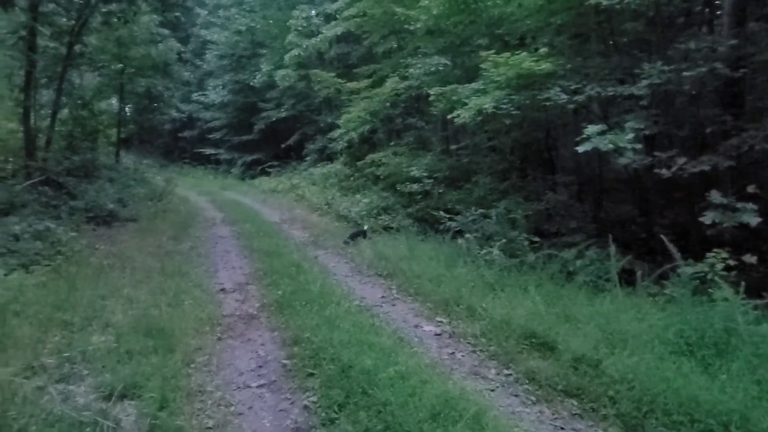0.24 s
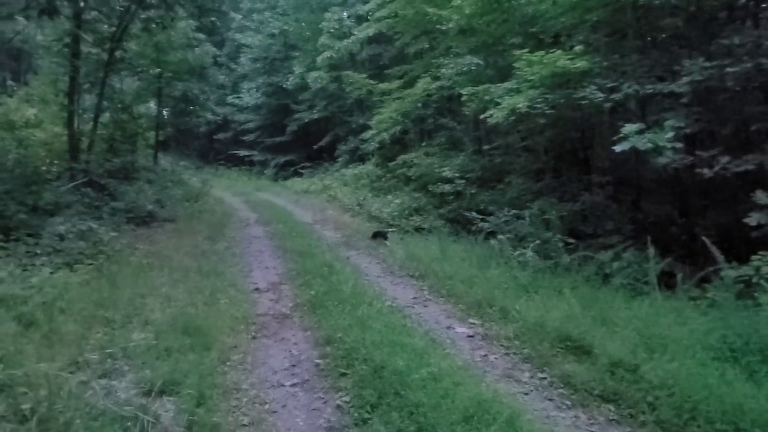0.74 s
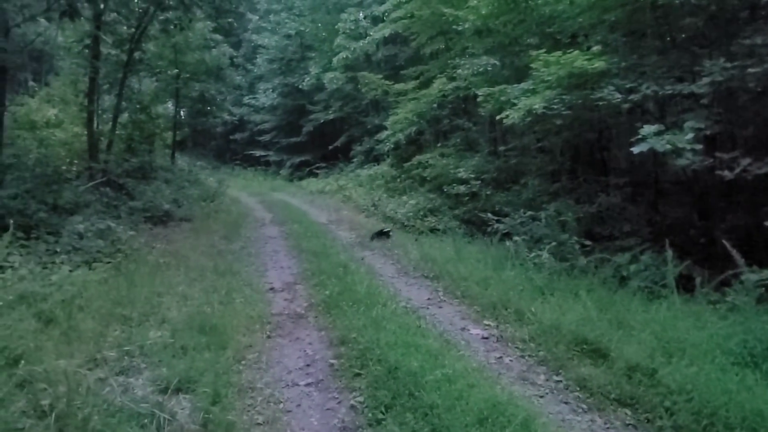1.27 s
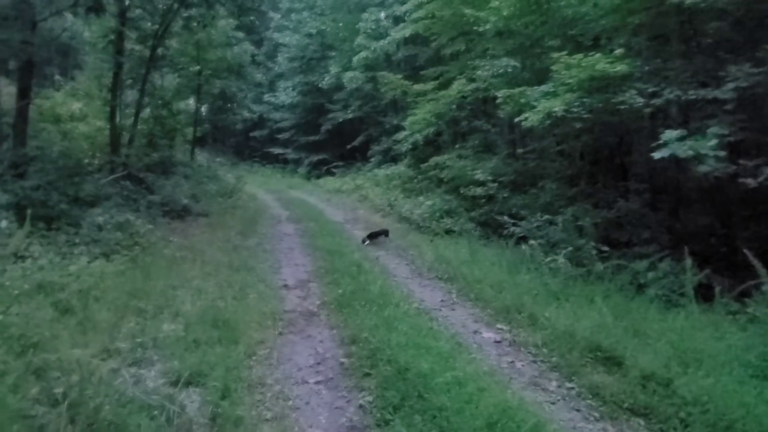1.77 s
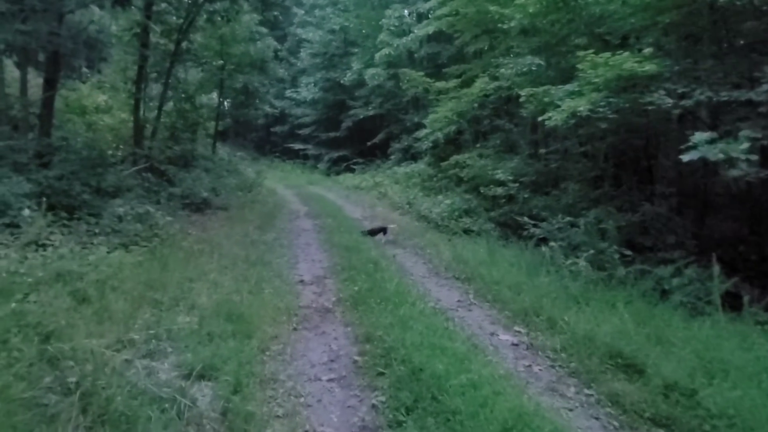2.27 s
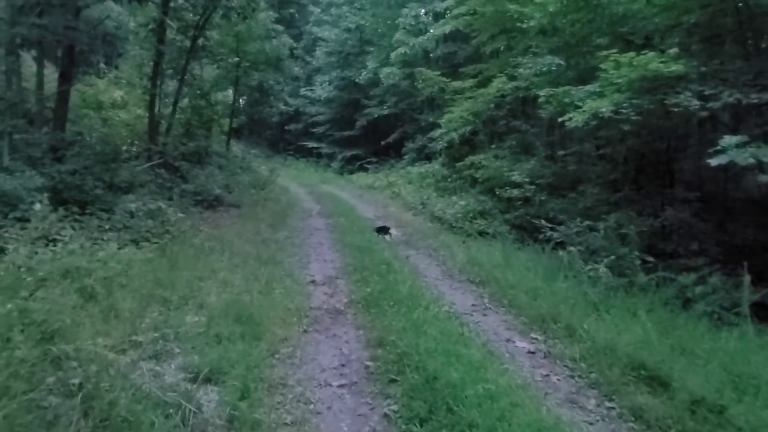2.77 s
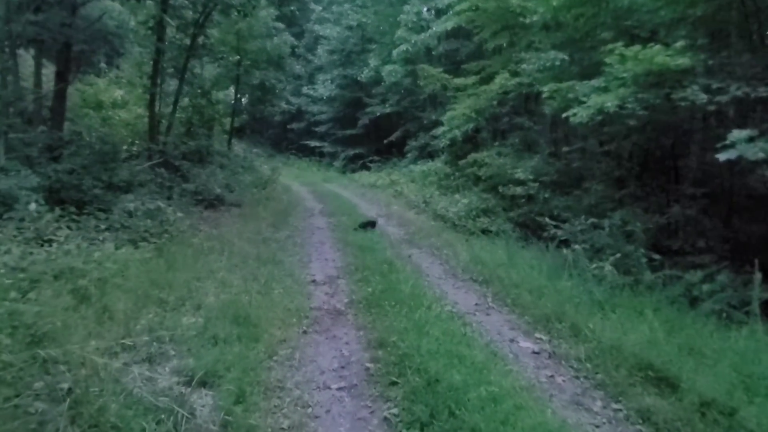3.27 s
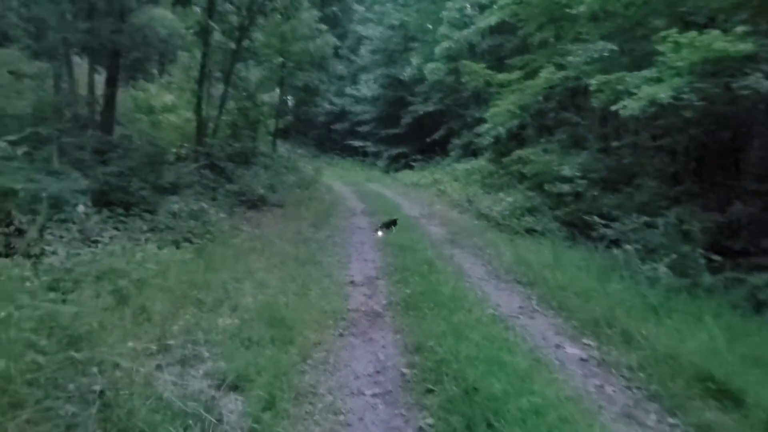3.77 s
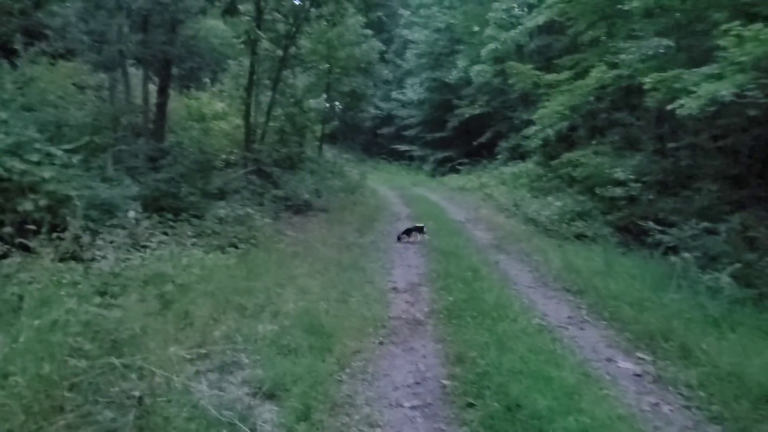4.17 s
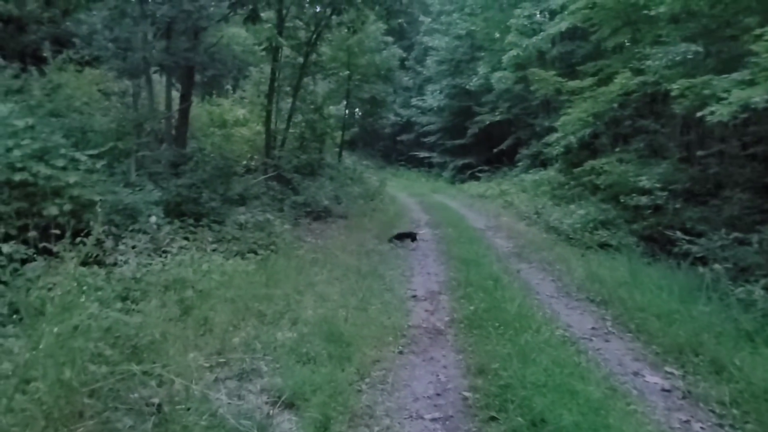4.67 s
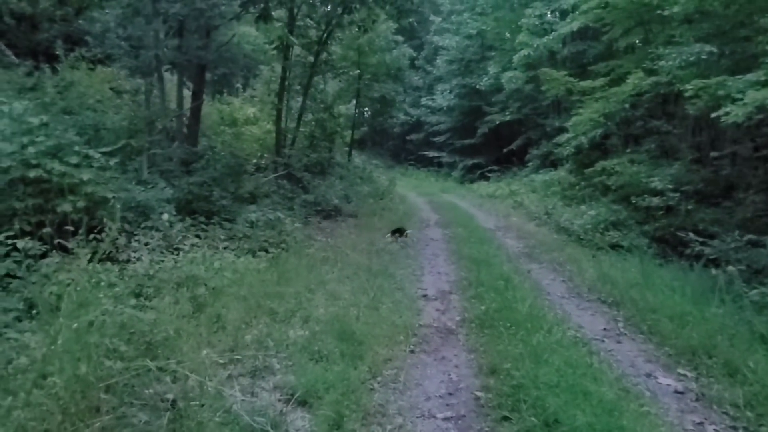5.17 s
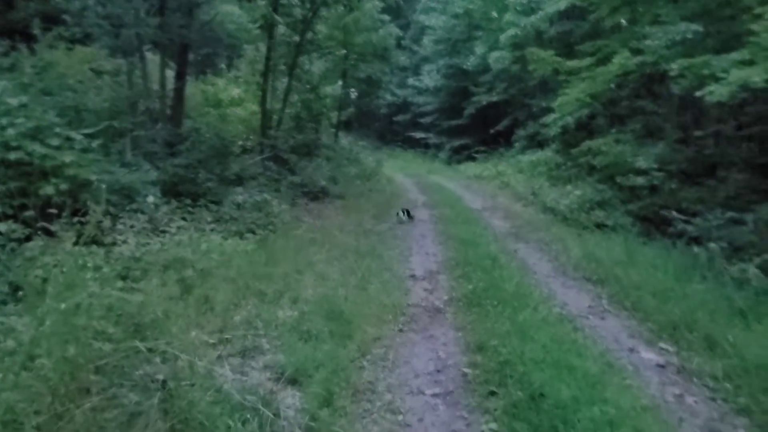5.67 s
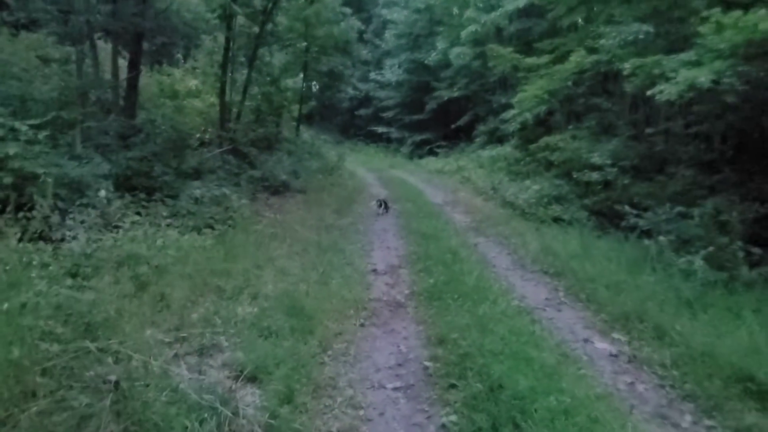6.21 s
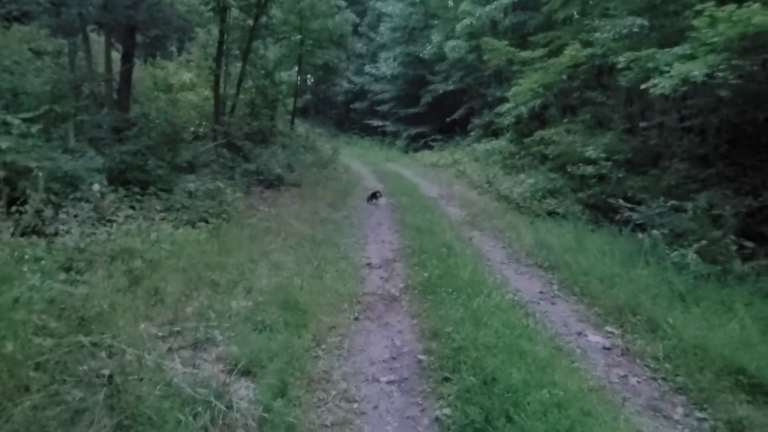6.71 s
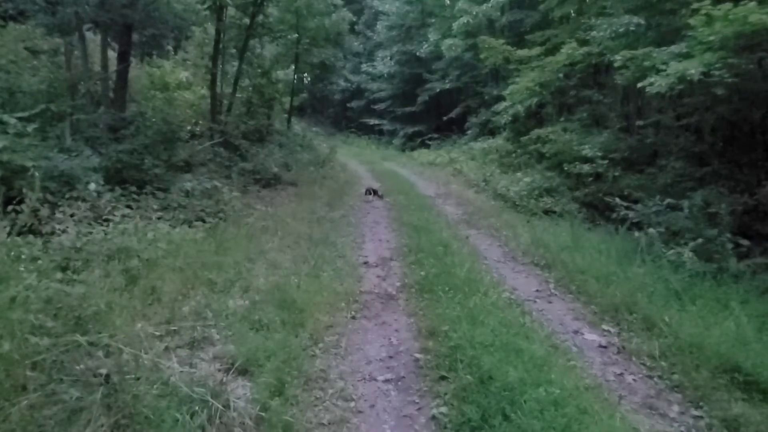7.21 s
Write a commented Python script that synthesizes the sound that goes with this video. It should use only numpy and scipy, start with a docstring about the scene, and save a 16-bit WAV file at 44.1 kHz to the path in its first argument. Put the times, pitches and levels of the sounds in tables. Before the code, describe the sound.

On a forest track, a hound at some distance bawls three times, a couple of seconds apart, each cry short, hoarse and ringing, with echoes lingering in the trees. Close to the microphone a small metal clasp jingles lightly throughout. Insects trill high and steady, crickets chirp faintly, and a distant engine hums very low. Dry handling knocks become strongest just after the last bawl.

```python
"""Forest track: a hound some way off bays three times, and the trees ring on after each hoarse bawl.
The voice is clear harmonics plus a fluttering rasp, throat resonances and hiss, convolved with scattered echoes.
Close by, a metal clasp of six decaying modes jingles, with noise-burst knocks and scuffs of handling.
Band-shaped noise makes the insect trill, falling sine strokes the crickets, a wavering sine the far engine's hum;
filtered noise is the still air."""
import sys
import numpy as np
from scipy import signal
from scipy.fft import rfft, irfft, next_fast_len
from scipy.io import wavfile
from scipy.ndimage import uniform_filter1d, minimum_filter1d

SR = 44100
rng = np.random.default_rng(int(sys.argv[2]) if len(sys.argv) > 2 else 0)


def dump(signal):
    """Clip the signal to [-1, 1] and save it as 16-bit WAV at the path in sys.argv[1]."""
    limited = np.clip(np.atleast_2d(signal).T, -1, 1)
    pcm = np.round(limited * 32767).astype(np.int16)
    wavfile.write(sys.argv[1], SR, pcm)


N = 328545
TIME, FREQS = np.arange(N) / SR, np.fft.rfftfreq(N, 1 / SR)


def amp(db):
    """Decibels to gain."""
    return 10 ** (np.asarray(db) / 20)


def evened(x):
    """Scales to rms 1."""
    return x / np.sqrt(np.mean(abs(x) ** 2) + 1e-20)


def shares(ratio_db):
    """Two gains, ratio_db apart, whose powers sum to 1."""
    ratio = amp(ratio_db)
    return np.array([ratio, np.ones_like(ratio)]) / np.sqrt(1 + ratio ** 2)


def read(points, hz):
    """Reads a spectrum table on a log-frequency axis."""
    f, value = np.transpose(points)
    return np.interp(np.log(hz + 1), np.log(f + 1), value)


def curves(rows, t):
    """Every column of a time table at the times t."""
    s, *columns = np.transpose(rows)
    return [np.interp(t, s, c) for c in columns]


def add(mix, start_s, sound):
    """Mixes a sound into a stereo mix at start_s."""
    part = mix[:, max(round(start_s * SR), 0):][:, :sound.shape[-1]]
    part += sound[..., :part.shape[-1]]


def panned(side_db):
    """Left and right gains, side_db apart, with rms 1."""
    return evened(amp([[side_db / 2], [-side_db / 2]]))


def coloured(x, points):
    """Filters by a spectrum table."""
    n = x.shape[-1]
    return irfft(rfft(x) * amp(read(points, np.fft.rfftfreq(n, 1 / SR))), n)


def noise(points, n):
    """Unrelated noise in both channels with the given spectrum, scaled to rms 1."""
    return evened(coloured(rng.standard_normal((2, next_fast_len(n))), points))[:, :n]


def wander(n, rate_hz):
    """Smooth random curve of rms 1 with a Gaussian roll-off at rate_hz."""
    m = next_fast_len(n)
    rolloff = np.exp(-(np.fft.rfftfreq(m, 1 / SR) / rate_hz) ** 2)
    return evened(irfft(rfft(rng.standard_normal(m)) * rolloff, m))[:n]


def angle(hz):
    """Running phase of a frequency curve."""
    return 2 * np.pi * np.cumsum(hz) / SR


def resonate(x, hz, width_hz, order=2):
    """A resonance that follows the curve hz, applied order times for steep flanks."""
    turn = np.exp(1j * angle(hz * np.ones(len(x))))
    r = np.exp(-np.pi * width_hz / SR)
    z = x / turn
    for _ in range(order):
        z = signal.lfilter([1 - r], [1, -r], z + 1e-18)
    return (turn * z).real


def steadied(x, size=1300):
    """Holds the loudness at 1 and keeps the fast grain."""
    return x / np.sqrt(abs(uniform_filter1d(x ** 2, size)) + 1e-12)


# low and middle throat resonances: settled_hz, gape_rise_hz, end_fall_hz
THROAT_HZ = [(809.8, 200, 70), (1507, 25, 13)]
# low, middle and high throat resonance: width_hz of one filter pass
THROAT_WIDTH_HZ = [390, 620, 640]
# turbulence in the throat: freq_hz, density_db
HOARSE = [(700, -25), (1100, -7.5), (1500, -7.5), (2100, 3), (3200, 0), (3800, -8), (4500, -24),
          (6000, -44.5)]
# how the rasp radiates: freq_hz, gain_db
MUZZLE = [(250, -29), (500, -20.5), (640, -5.5), (760, -2), (1050, -1.5), (1180, 1.5), (1330, -5),
          (2050, 2), (3500, -1.5), (4300, -8.5)]
# hiss on top of the bawl: freq_hz, density_db
VOICE_AIR = [(2500, -23), (3500, -4), (4400, 4), (5700, -2.5), (7000, 3), (8200, -9.5), (11500, -5),
             (12800, -7.5), (15500, -14)]
SCOOP_SHARE, SCOOP_S, DROOP_S = .26, .032, .05  # pitch starts low, scoops up, droops at the end
WAVER_SHARE, WAVER_HZ, THROAT_DRIFT_SHARE = .014, 14.75, .028
RELEASE_S, GAPE_S = .035, .08  # the mouth starts wide and settles with GAPE_S
# clear fundamental over the rasp: grows as the voice tires and as pitch climbs into the low resonance
CLEAR_TIRED_DB, CLEAR_GAPE_DB, CLEAR_DB_PER_HZ, CLEAR_FROM_HZ = 6, -14.5, 0.06, 665
OCTAVE_TIRED_DB = -13.5  # the octave fades toward the end
HISS_ENDS_DB = -43  # drop one bawl's length from the hiss peak
HISS_BURST_DB, HISS_BURST_HZ = 4.5, 6  # the hiss comes unevenly
PUSH_HZ_PER_DB = 1.5  # pushing harder sharpens the note
BRIGHT_HZ_PER_DB = 8  # a brighter voice lifts the middle resonance
OPEN_HZ, OPEN_WIDTH_HZ = 1980, 900


def bawl(row, effort, jitter=.01, second_side=0.94, lower_side=.15, clear_top=0.95, third_db=-17,
         chest_db=-34, low_db=1.0, middle_db=1.0, high_db=-3, open_db=-2, settled_gape=0.16, hoarse_db=-7):
    """The folds sing a high clear note while looser tissue flutters unevenly and rasps above each harmonic."""
    (start_s, end_s, attack_s, held_hz, yelp_hz, yelp_at_s, yelp_s, droop_hz,
     clear_db, octave_db, hiss_db, hiss_peak) = row
    t = np.arange(0, end_s - start_s, 1 / SR)
    n, spent = len(t), t / t[-1]
    gape = np.exp(-t / GAPE_S)
    yelp = np.exp(-((t - yelp_at_s) / yelp_s) ** 2)
    level_db, bright_db, treble_db, high_hz = curves(effort, start_s + t)

    hz = held_hz * (1 - SCOOP_SHARE * np.exp(-t / SCOOP_S) + WAVER_SHARE * wander(N, WAVER_HZ)[:n])
    hz = hz + yelp_hz * yelp - droop_hz * np.exp((t - t[-1]) / DROOP_S)
    throat_hz = [(f + rise * gape - fall * spent) * (1 + THROAT_DRIFT_SHARE * wander(N, WAVER_HZ)[:n])
                 for f, rise, fall in THROAT_HZ]
    hz = hz + PUSH_HZ_PER_DB * (level_db - level_db.mean())
    throat_hz[1] = throat_hz[1] + BRIGHT_HZ_PER_DB * bright_db

    # low and middle registers share their power between a clear line and the rasp
    clear_ratio_db = clear_db + CLEAR_TIRED_DB * spent + CLEAR_GAPE_DB * gape
    clear_ratio_db = clear_ratio_db + CLEAR_DB_PER_HZ * np.maximum(hz - CLEAR_FROM_HZ, 0)
    first, low = shares(clear_ratio_db) * amp(level_db + low_db)
    octave, middle = shares(octave_db + OCTAVE_TIRED_DB * spent ** 2) * amp(level_db + bright_db + middle_db)
    high = amp(level_db + treble_db + high_db)
    between = np.sqrt(middle * high)

    folds = angle(hz * (1 + jitter * wander(n, 90)))
    clear = first * np.cos(folds) + octave * (np.cos(2 * folds) + amp(third_db) * np.cos(3 * folds))
    clear *= np.sqrt(2) * (1 + .27 * wander(n, 80))

    # flutter sidebands lie mostly upward; the low resonance pulls the first onto itself
    flutter = angle(np.maximum(throat_hz[0] - hz, 100) * (1 + .16 * wander(n, 70)))
    sidebands = np.exp(1j * flutter) * (1 + .5 * wander(n, 86))
    sidebands = sidebands + second_side * np.exp(1j * (1.8 * flutter + 2 * wander(n, 23)))
    sidebands = sidebands + lower_side * np.exp(-1j * flutter)
    shaken = folds + angle(hz * .025 * wander(n, 110))
    pulses = sum(np.exp(1j * k * shaken) for k in range(1, 9))
    puffs = rng.standard_normal(n) * (1 + np.cos(flutter)) * (1 + 0.47 * np.cos(folds))
    drive = evened((pulses * sidebands).real) + .58 * evened(puffs)

    upper_lines = evened(sum(np.cos(k * folds) for k in range(3, 8)))
    drives = [drive, drive, drive + clear_top * upper_lines]
    registers = zip(drives, (low, middle, high), throat_hz + [high_hz], THROAT_WIDTH_HZ)
    rasp = sum(gain * steadied(resonate(d, f, width, order=3)) for d, gain, f, width in registers)
    # the wide mouth lets through harmonics between the resonances
    open_drive = drive + gape * upper_lines + evened(puffs) / 2
    open_voice = steadied(resonate(open_drive, OPEN_HZ, OPEN_WIDTH_HZ, order=3))
    rasp += amp(open_db) * between * (gape + settled_gape) * open_voice
    # flutter-chopped turbulence fills the gaps between the upper resonances
    hoarse = evened(coloured(evened(drive) + evened(puffs), HOARSE))
    rasp += amp(hoarse_db) * between * (1 + gape) * hoarse
    rasp = coloured(rasp, MUZZLE)

    chest = amp(chest_db) * low * evened(resonate(puffs, 365, 76))
    hiss_level_db = hiss_db + HISS_ENDS_DB * (spent - hiss_peak) ** 2
    hiss_level_db = hiss_level_db + HISS_BURST_DB * wander(N, HISS_BURST_HZ)[:n]
    hiss = amp(hiss_level_db) * noise(VOICE_AIR, n)
    edges = np.minimum(t / attack_s, (t[-1] - t) / RELEASE_S)
    swell = np.sin(np.pi / 2 * np.clip(edges, 0, 1)) ** 2
    return start_s, (clear + rasp + chest + hiss) * swell


def scatter(t60, start_s, build_s, length=3 * SR):
    """Echoes from countless scatterers: they build up, then each band dies at its own speed."""
    hz, t, z = signal.stft(rng.standard_normal((2, length)), SR, nperseg=512)
    age = np.maximum(t - start_s, 0)
    z = z * amp(-60 * age / read(t60, hz)[:, None]) * (1 - np.exp(-age / build_s))
    z /= np.sqrt(np.mean(np.sum(abs(z[:, 6:20]) ** 2, -1)))  # unit energy, bins 6-19
    return signal.istft(z, SR, nperseg=512)[1] * np.sqrt(3 / 2) / np.sqrt(512 * 256)


# bawls: start_s, end_s, attack_s, held_hz, yelp_rise_hz, yelp_delay_s, yelp_half_s, droop_hz,
# clear_over_rasp_db, octave_over_rasp_db, hiss_peak_db, hiss_peak_at [share of length]
BAWLS = [(0.352, 0.841, 0.024, 622.4, 49.9, .21, .14, 50, -7.5, -2.5, -55.5, 0.37),
         (2.744, 3.318, .032, 633.5, 142.3, .104, .044, 40.6, -5.5, 2.5, -50, 0.5),
         (5.627, 6.064, 0.015, 641, 68.02, .122, .08, 5.6, 0, 4, -52.5, 0.41)]
# effort through each bawl, before the register trims:
# time_s, low_db, middle_rel_low_db, high_rel_low_db, high_throat_hz
EFFORT = [
    [(0.378, -23, -3.5, 1.5, 2920), (0.414, -17, -4, -2.5, 2840), (0.448, -18, 0.5, -15.5, 2580),
     (0.512, -15, -3.5, -21, 2610), (0.628, -23, 6.5, -3, 2906), (0.68, -26, 7.5, -17, 2900),
     (0.728, -23.5, 3, 0, 2470), (0.746, -23, -4.5, -15.5, 2600), (0.766, -33, 9.5, -5, 2870),
     (0.815, -30, -0.5, -7.5, 2570)],
    [(2.77, -26.5, 5, -1.5, 2830), (2.804, -14.5, -4.5, -12.5, 2820), (2.856, -12, -19, -29.5, 2710),
     (2.89, -17, -3, -15.5, 2660), (2.976, -25, -4, -1, 2830), (3.02, -20, -6, -10, 2660),
     (3.054, -24.5, -0.5, 3, 2430), (3.128, -19, -1.5, -11, 2700), (3.248, -24, 4.5, -1, 2750),
     (3.295, -23, -2, -11, 2700)],
    [(5.645, -32, 11, -5, 2800), (5.687, -17, 3.5, -14, 2850), (5.707, -15.5, -4, -9.5, 2760),
     (5.813, -19, 2, -6.5, 2690), (5.855, -22.5, 1.5, -6, 2790), (5.881, -18.5, -5.5, -14.5, 2610),
     (5.949, -34.5, 9, 2.5, 2510), (5.987, -20.5, 1, -9, 2730), (6.011, -29.5, -0.5, 0, 2450),
     (6.04, -30.5, 4, -7, 2470)],
]
# deep forest decay: freq_hz, t60_s
FOREST_T60 = [(300, 2.6), (650, 2.2), (1400, 1.9), (2800, 3.4), (6000, .7)]
# colour of the forest's echo: freq_hz, gain_db
WOODS = [(400, 4.5), (650, 0.5), (850, -2), (1080, 3), (1350, -3), (1700, 5), (2100, 3.5), (2800, 1)]
# voice balance: freq_hz, left_minus_right_db
VOICE_SIDE = [(380, -.5), (700, .8), (1300, 3.2), (2500, 4.6), (4400, 1.5), (8000, -4), (15000, 1)]
HILL_S = .7


def hound(early_db=-13, near_db=-24, far_db=-26, hill_db=-36):
    """The bawls, scattered by the verge, the nearby trees, the deep forest and a far hillside."""
    dog = np.zeros((2, N))
    for row, effort in zip(BAWLS, EFFORT):
        add(dog, *bawl(row, effort))
    # leaves and stems scatter short waves best
    verge = scatter([(600, 0.1), (3000, 0.48)], .001, 0.0014)
    verge = coloured(verge, [(600, 12), (1400, 8.0), (2800, 12.0), (5000, 11.0)])
    woods = amp(near_db) * scatter([(600, 1.0), (3000, 1.0)], 0.036, .03)
    woods += amp(-10.5) * scatter([(600, 0.11), (3000, 0.28)], .012, .01)
    woods += amp(far_db) * scatter(FOREST_T60, 0.018, 0.051)
    # the far hillside answers
    woods += amp(hill_db) * scatter([(300, 3.8), (1400, 1.6), (3000, 1.0)], HILL_S, HILL_S / 8)
    woods = coloured(woods, WOODS)
    heard = dog + signal.fftconvolve(dog, woods + amp(early_db) * verge, axes=1)[:, :N]
    side_db = read(VOICE_SIDE, FREQS)
    return irfft(rfft(heard) * amp([side_db / 2, -side_db / 2]), N)


# light touch: low_db, lower_treble_db, upper_treble_db
TOUCH_DB = [-55.5, -58.5, -54]
TOUCH_GAP_S, TOUCH_SPREAD_DB = .19, 0.6


def touches(count=39):
    """Light, loosely regular touches of the swinging clasp, as rows like its strikes."""
    times_s = (np.arange(count) + rng.random(count)) * TOUCH_GAP_S
    levels_db = TOUCH_DB + TOUCH_SPREAD_DB * rng.standard_normal((count, len(TOUCH_DB)))
    return np.column_stack([times_s, levels_db]).tolist()


# clear strikes: start_s, low_db, lower_treble_db, upper_treble_db
JINGLES = [(0.636, -70, -62, -48), (0.958, -47, -55, -62), (1.139, -57, -49, -59), (1.715, -58, -67, -51),
           (2.067, -44.5, -53, -50), (2.186, -46, -46, -47), (2.569, -45, -58, -68), (2.648, -66, -52, -46),
           (2.869, -64, -38, -40.5), (3.1, -38, -42, -36), (3.407, -48, -55, -50), (3.985, -42.5, -47, -54),
           (4.091, -66, -56, -43.5), (4.296, -51, -53.5, -48), (4.582, -52.5, -66.5, -59.5),
           (4.737, -47, -42, -49), (4.915, -49, -71, -62), (5.046, -43, -61, -49.5),
           (5.166, -50.5, -68, -51), (5.28, -38.5, -39.5, -47), (5.866, -64, -47, -56),
           (6.148, -45, -47.5, -48), (6.42, -44.5, -48, -45), (6.623, -47, -45, -49),
           (6.801, -62, -57, -46), (6.992, -49, -57, -46), (7.367, -56.5, -58, -42)]
# clasp modes: gain_db, t60_s, driving_level [index of strike level column]
CLASP_MODES = [(4, .26, 0), (-3.5, .12, 0), (-5.5, 0.39, 2), (-18, .12, 1), (4.5, .22, 1), (0.5, .19, 2)]
# the same modes: pitch_hz, before slight random detuning
CLASP_HZ = [2728, 2920, 6950, 11480, 12525, 12910]
# metal on metal, also in the knocks: freq_hz, density_db
SNAP = [(1500, -29.5), (2700, 7), (4000, -9), (5800, -30), (7000, 13), (8500, -39.5), (11000, -2.5),
        (12700, -8.5), (15500, -1.5)]
# a hard strike rings at once, a light one is rubbed up slowly
HARD_DB, HARD_RISE_S, SOFT_RISE_S = -47.5, .0006, .003


def clasp(side_db=4, tick_db=-1, level_db=0):
    """Each touch gives a tiny tick and rings the metal's few modes, a little detuned by the way it hangs."""
    out, t = np.zeros((2, N)), np.arange(SR // 3) / SR
    modes = len(CLASP_MODES)
    for start_s, *levels in JINGLES + touches():
        peak_db = max(levels)
        # each mode is 1.1 rad apart between the channels
        phases = rng.uniform(0, 2 * np.pi, (modes, 1, 1)) + np.array([[0], [1.1]])
        tuning_hz = np.array(CLASP_HZ) * (1 + .0015 * rng.standard_normal(modes))
        ring = np.zeros((2, len(t)))
        for hz, (db, t60, column), phase in zip(tuning_hz, CLASP_MODES, phases):
            decay = amp(levels[int(round(column))] + db - 60 * t / t60)
            ring += decay * np.sin(2 * np.pi * hz * t + phase)
        ring *= 1 + 0.41 * wander(len(t), 45)  # the parts keep brushing each other
        tick = noise(SNAP, len(t)) * np.exp(-t / 0.0071)
        tick = tick * min(1, amp(.5 * (peak_db + 39)))  # light touches hardly tick
        rise_s = np.interp(peak_db, [HARD_DB - 11.5, HARD_DB], [SOFT_RISE_S, HARD_RISE_S])
        touch = ring * (1 - np.exp(-t / rise_s)) + amp(tick_db + peak_db) * tick
        add(out, start_s, amp(level_db) * panned(side_db) * touch)
    return out


# knocks and ticks: start_s, thud_db, thud_hz, snap_db, left_minus_right_db
KNOCKS = [(1.138, -36, 1730, -56, -7), (4.288, -38, 2607, -62, 0), (4.395, -37.5, 524, -69.5, -1),
          (4.822, -38, 972, -71, 3), (5.55, -29, 1900, -78, 3.5), (6.032, -21.5, 2480, -60, -32.5),
          (6.094, -26, 2002, -69, -26), (6.163, -15, 1750, -37, 11), (6.187, -16, 1470, -39, 14),
          (6.622, -48, 2700, -47, -9), (6.801, -51, 2680, -39.5, -1), (6.993, -45, 2910, -30.5, 4),
          (7.004, -42, 3100, -36, -7), (7.432, -42.5, 1740, -47, 4)]
# scuffs and rustles: start_s, length_s, dull_db, crisp_db
SCUFFS = [(2.041, 0.31, -64.5, -55.5), (3.794, 0.19, -67, -84), (4.362, 0.12, -46, -53.5),
          (5.141, 0.057, -64.5, -70), (6.993, 0.063, -86, -58)]
# dull part of a scuff: freq_hz, density_db
SCUFF_DULL = [(70, -18), (170, -7.5), (330, -3), (650, -7.5), (1000, -23), (1400, -6), (2500, -29.5),
              (5000, -48)]
# crisp part of a scuff: freq_hz, density_db
SCUFF_CRISP = [(1500, 3), (2700, 7), (4500, 3), (8000, -4), (13000, -5), (16000, -56)]


def handling(ring_db=-13, ring_s=0.01, snap_s=0.01):
    """Dry knocks, each a pressure pulse with decaying noise, and short grainy scuffs of rubbing."""
    out, t = np.zeros((2, N)), np.arange(2048) / SR
    for start_s, thud_db, hz, snap_db, side_db in KNOCKS:
        u = 2 * np.pi * hz * (t - .001)
        push = -u * np.exp((1 - u ** 2) / 2)
        body_band = [(hz / 5, -22), (hz / 2, -6), (hz, 0), (hz * 2, -20), (hz * 5, -36)]
        body = noise(body_band, len(t)) * np.exp(-t / ring_s)
        snap = noise(SNAP, len(t)) * np.exp(-t / snap_s)
        knock = amp(thud_db) * (push + amp(ring_db) * body) + amp(snap_db) * snap
        add(out, start_s - .001, panned(side_db) * knock)
    for start_s, length_s, dull_db, crisp_db in SCUFFS:
        n = int(length_s * SR)
        # the dull part is the same in both channels
        rub = amp(dull_db) * noise(SCUFF_DULL, n)[0] + amp(crisp_db) * noise(SCUFF_CRISP, n)
        add(out, start_s, rub * amp(3 * wander(n, 250)) * signal.windows.tukey(n, .5))
    return out


# insect chorus: freq_hz, density_db
TRILL = [(3290, -41.5), (5600, -18), (5760, -33.5), (6110, 9), (6710, 14.5), (7190, -4.5), (7330, -36.5),
         (7900, -46), (10300, -68), (17400, -120)]
# chorus level before trill_db: time_s, level_db
TRILL_DB = [(0, -57), (2.5, -56.5), (4.5, -57), (6.5, -53.5), (7.45, -52)]
# bouts of even chirps, before cricket_db and echo_db: start_s, end_s, gap_s, pitch_hz, level_db
CRICKETS = [(0, 1.3, 1.12, 4560, -55.5), (.19, .5, .47, 5130, -58.5), (2.448, 3.7, 1.07, 4526, -63),
            (4.11, 5.3, 0.43, 5090, -59.5), (4.754, 7.4, 0.63, 4710, -60.5)]


def insects(syllable_s=.043, trill_side_db=-5, trill_db=1, cricket_db=-4, echo_db=-6, count=4):
    """A blurred chorus of trills, and crickets deep in the brush whose every wing stroke falls in pitch."""
    crickets, t = np.zeros((2, N)), np.arange(1100) / SR
    chorus = noise(TRILL, N) * amp(curves(TRILL_DB, TIME)[0] + trill_db + .8 * wander(N, 50))
    brush = scatter([(600, 0.2), (5000, .6)], .004, 0.015, SR)
    for start_s, end_s, gap_s, hz, db in CRICKETS:
        for chirp_s in np.arange(start_s, end_s, gap_s):
            for k in range(count):
                pitch_hz = hz * (1 + .008 * rng.standard_normal() + .09 * (.5 - t / t[-1]))
                stroke = amp(db) * np.sin(angle(pitch_hz)) * np.hanning(len(t))
                add(crickets, chirp_s + k * syllable_s, stroke)
    echoes = signal.fftconvolve(crickets, brush, axes=1)[:, :N]
    return amp(cricket_db) * crickets + amp(echo_db) * echoes + panned(trill_side_db) * chorus


# still air: freq_hz, density_db
AIR = [(15, -37.5), (25, -17), (84, -4.5), (153, -16), (700, -15), (1000, -23), (1400, -22), (1790, -27),
       (2410, -23.5), (2760, -13), (3620, -31.5), (5570, -29.5), (6560, -23.5), (7920, -41), (11600, -41),
       (12500, -25.5), (16000, -37.5)]
AIR_DB = -60  # rms of the mono sum within 130-2000 Hz, before air_db and the wander
# far engine, before hum_db: time_s, level_db
HUM_DB = [(0, -69.5), (1.7, -51.5), (3.6, -53), (4.6, -49), (6.9, -50.5), (7.45, -65)]
HUM_HZ = 75.4


def background(air_db=0, hum_lag_rad=0.12, hum_db=1):
    """Still air, partly shared by both channels in the bass, and the wavering hum of a far engine."""
    own = rng.standard_normal((2, N))
    own = coloured(own, [(30, -3), (80, -4), (300, -3), (1000, -2), (3000, 0)])
    shared = coloured(rng.standard_normal(N), [(60, 4.5), (300, 2), (1000, -29.5), (3000, -30.5)])
    air = coloured(shared + own, AIR)
    band = signal.butter(4, [130, 2000], "band", fs=SR, output="sos")
    body = signal.sosfilt(band, air.mean(0))
    turn = angle(HUM_HZ + 0.83 * wander(N, 10)) + np.array([[0], [hum_lag_rad]])
    hum = np.sin(turn) * amp(curves(HUM_DB, TIME)[0] + hum_db + 2.2 * wander(N, 13))
    return air * amp(AIR_DB + air_db + 1.1 * wander(N, 9)) / body.std() + hum


def scene():
    """Everything heard on the track."""
    return hound() + clasp() + handling() + insects() + background()


EDGE_HZ = 15850


def record(dry, ceiling=.92):
    """A quick limiter rounds off the loudest peaks; then a low-pass limits the band."""
    room = np.minimum(1, ceiling / (abs(dry).max(0) + 1e-9))
    gain = uniform_filter1d(minimum_filter1d(room, size=441), size=441)
    lowpass = signal.firwin(511, EDGE_HZ, window=("kaiser", 9), fs=SR)
    return signal.oaconvolve(dry * gain, lowpass[None], "same")


dry = scene()
out = record(dry)
dump(out)
```